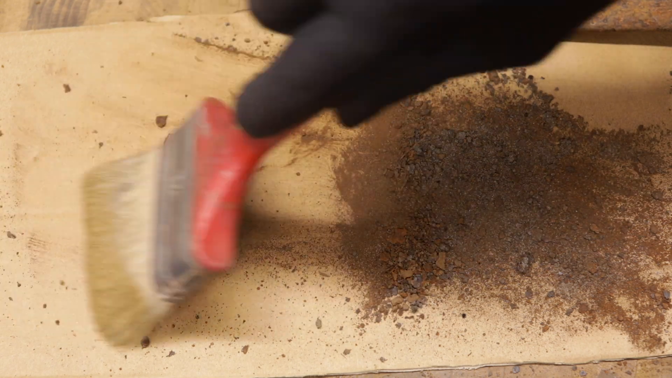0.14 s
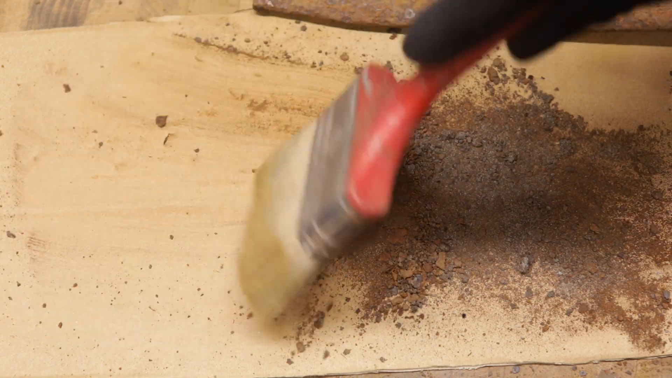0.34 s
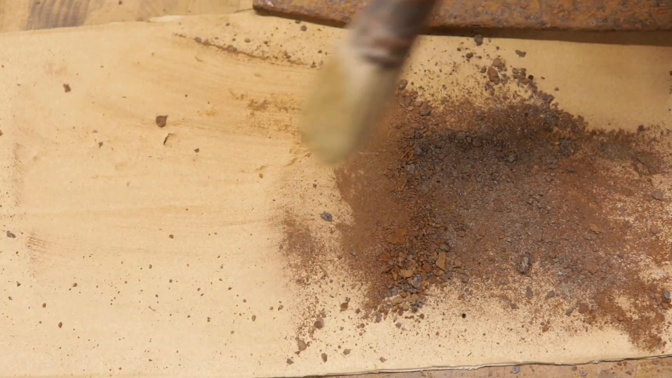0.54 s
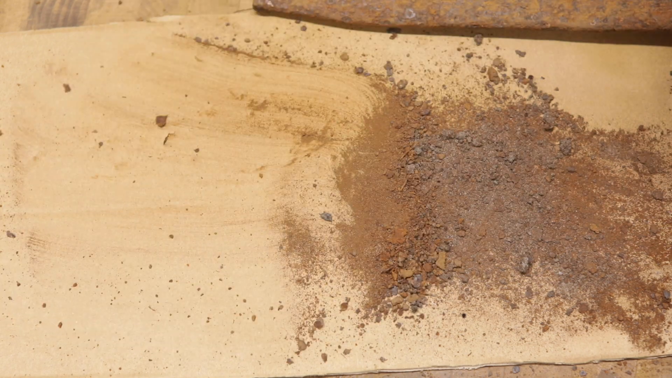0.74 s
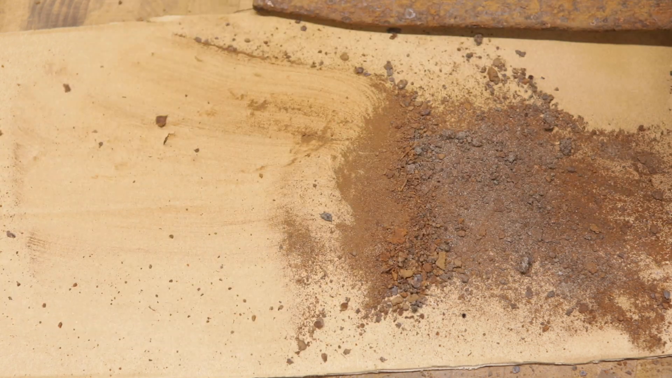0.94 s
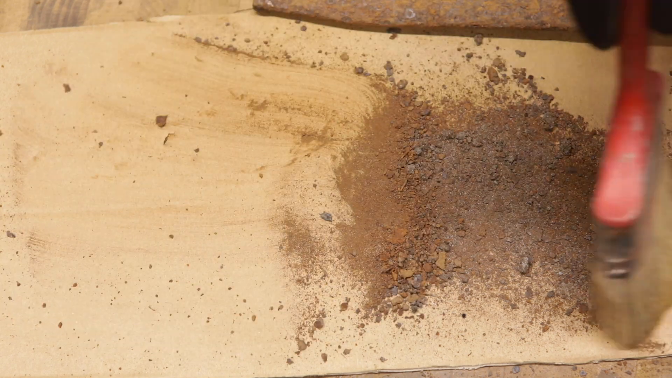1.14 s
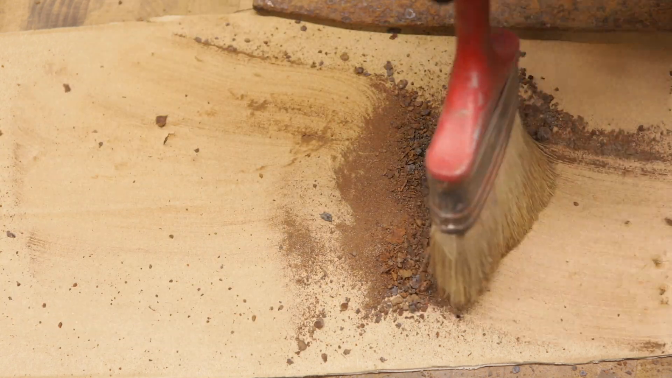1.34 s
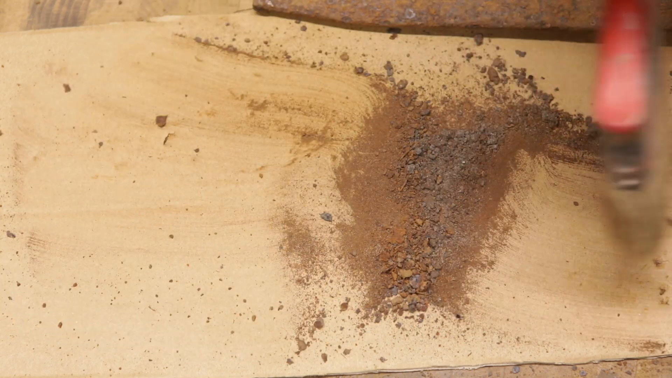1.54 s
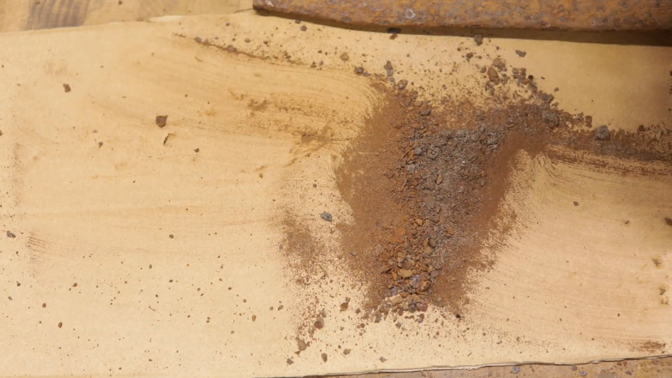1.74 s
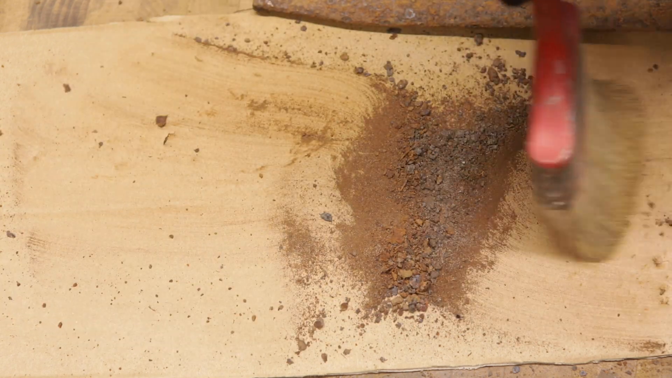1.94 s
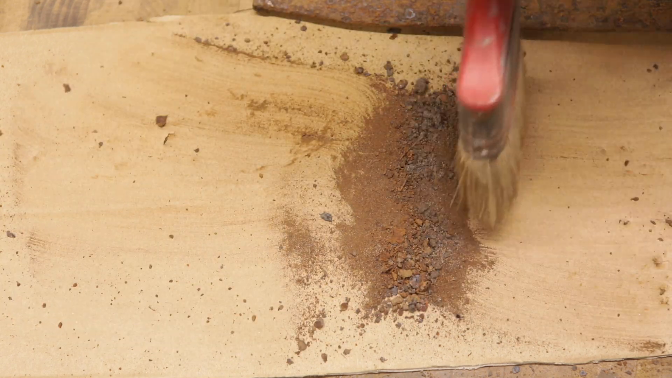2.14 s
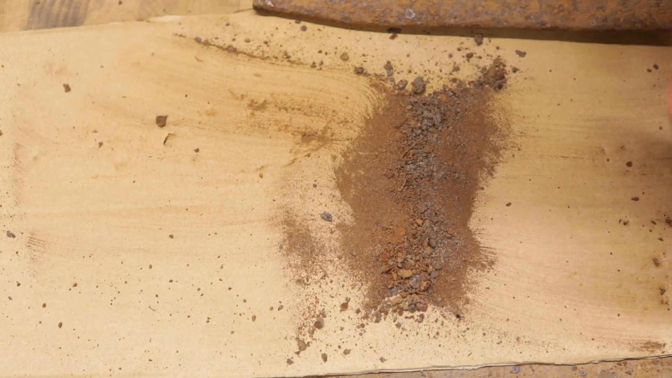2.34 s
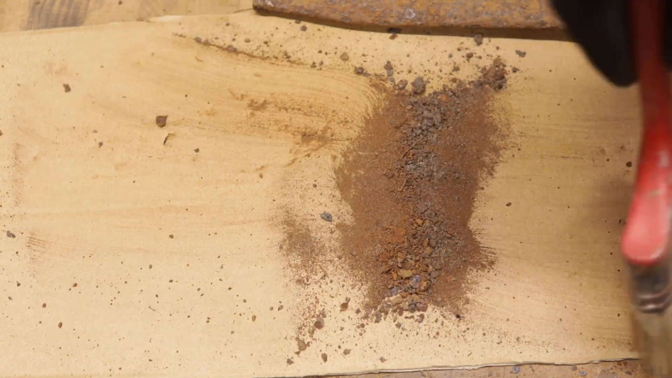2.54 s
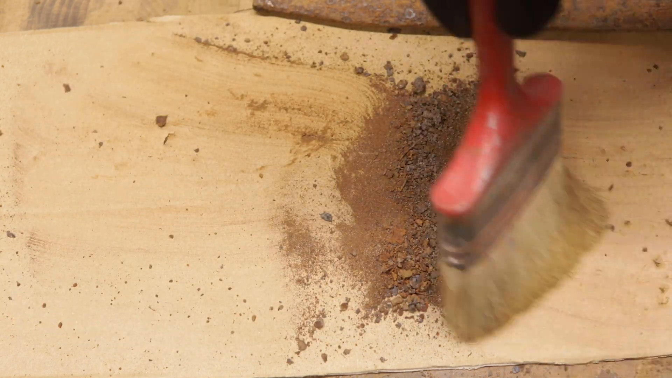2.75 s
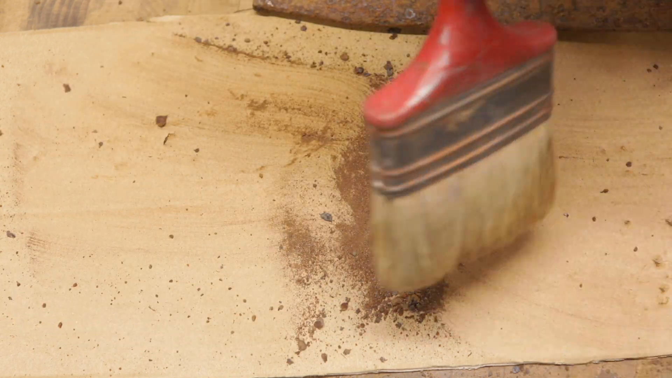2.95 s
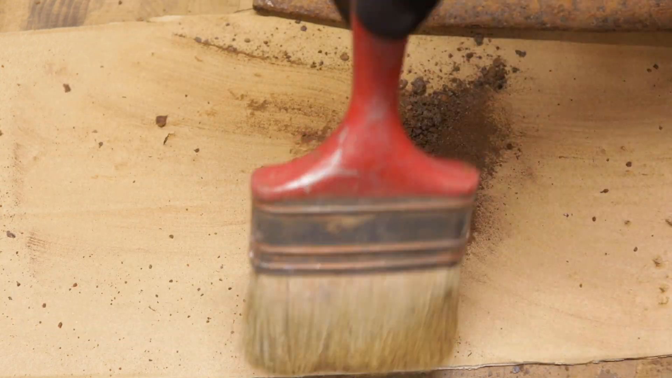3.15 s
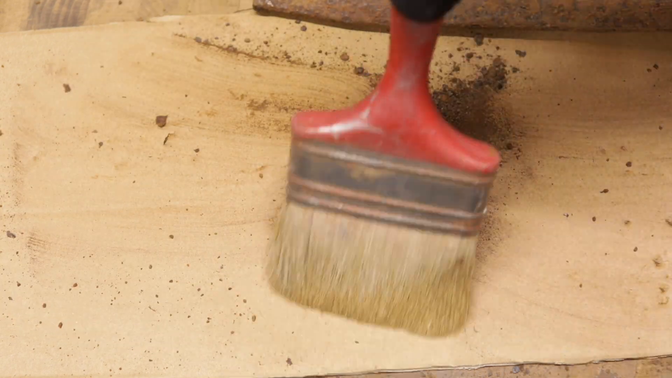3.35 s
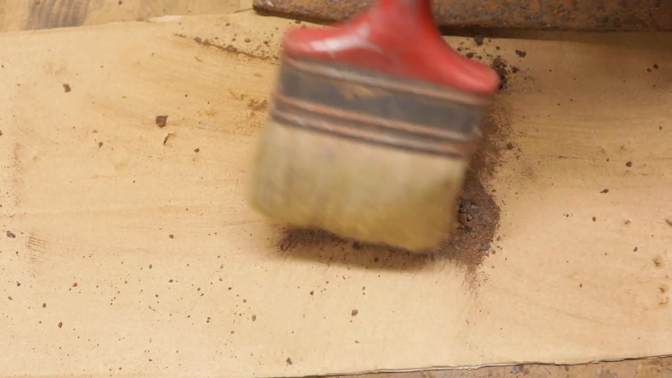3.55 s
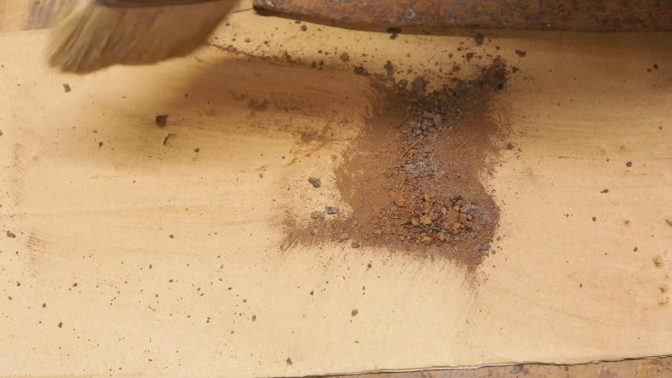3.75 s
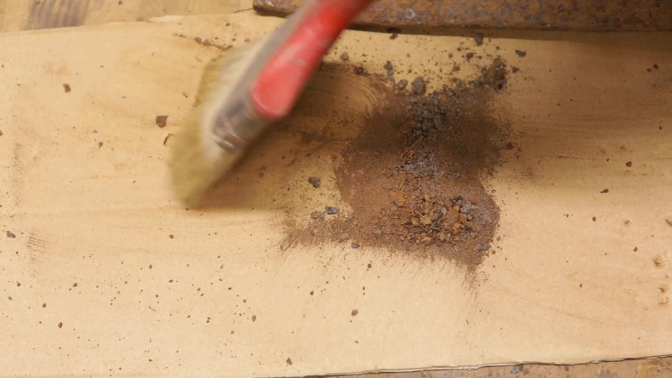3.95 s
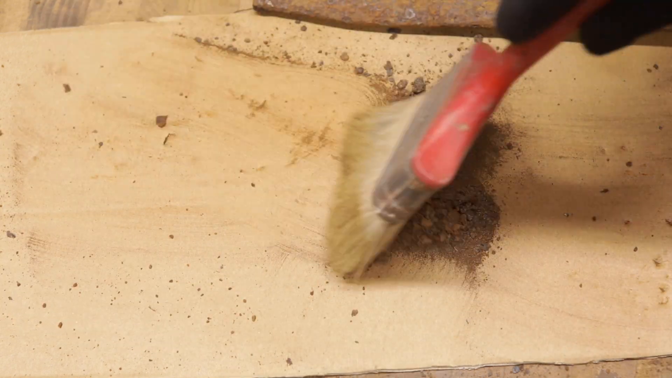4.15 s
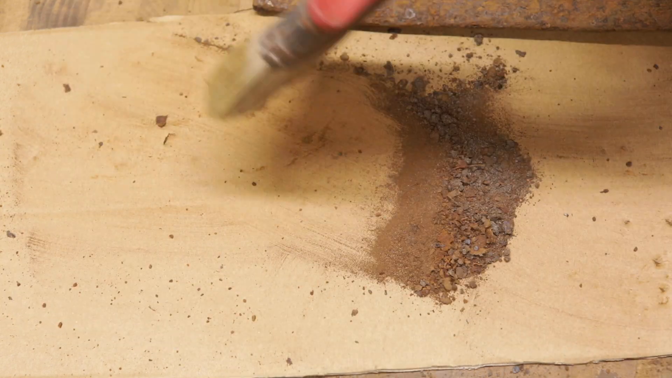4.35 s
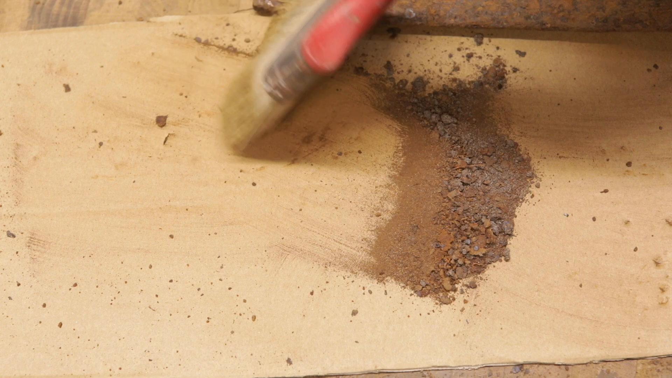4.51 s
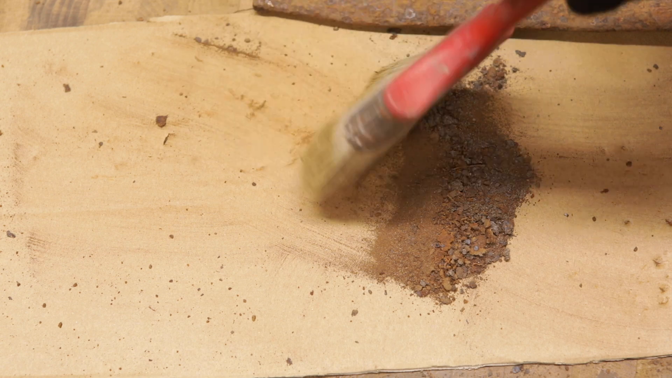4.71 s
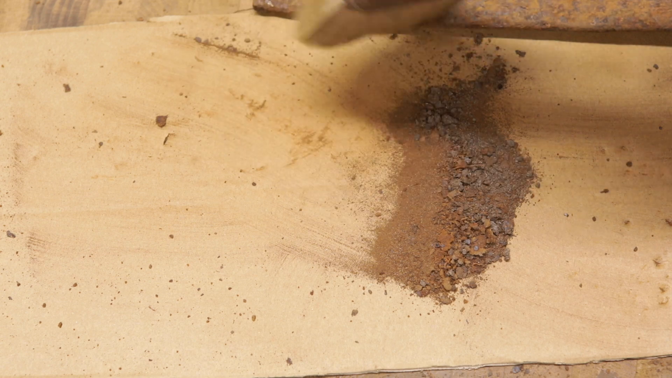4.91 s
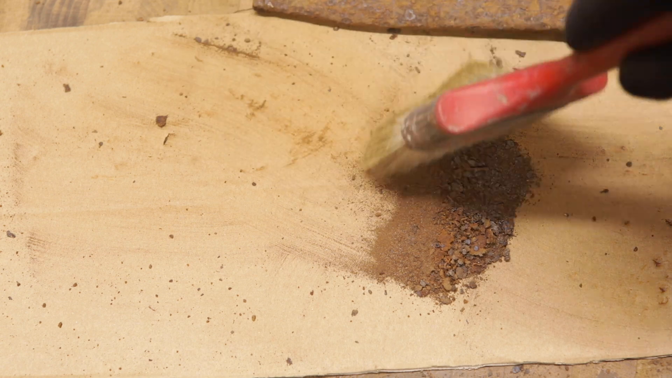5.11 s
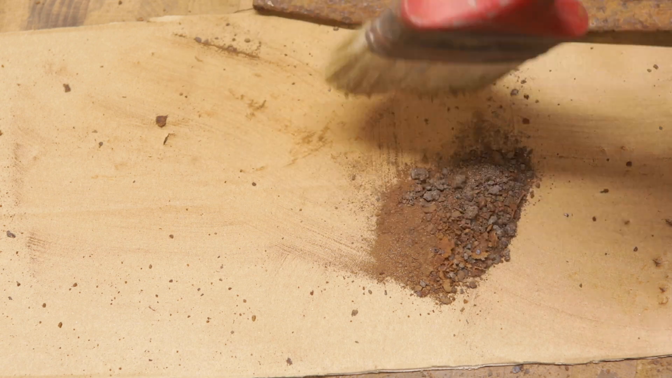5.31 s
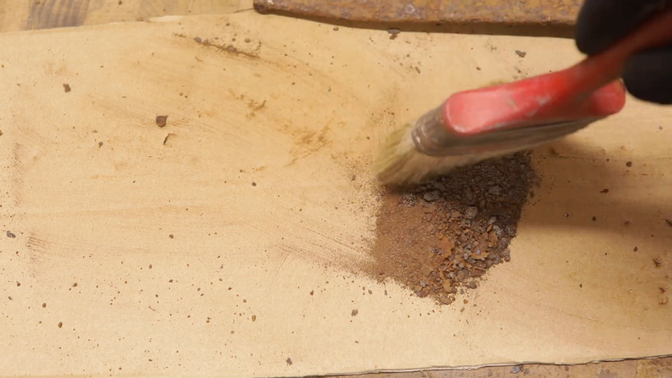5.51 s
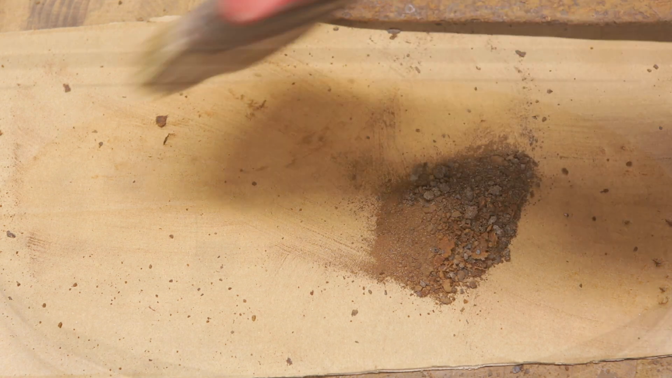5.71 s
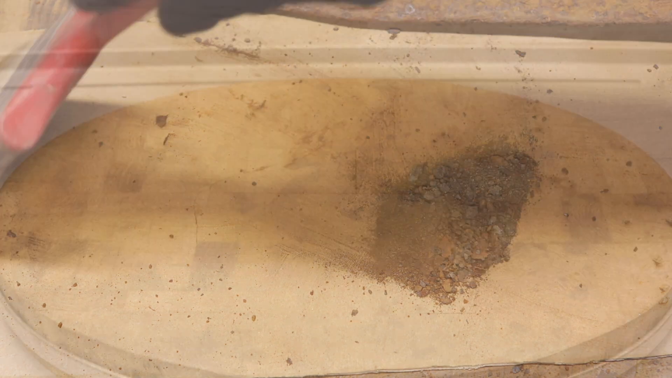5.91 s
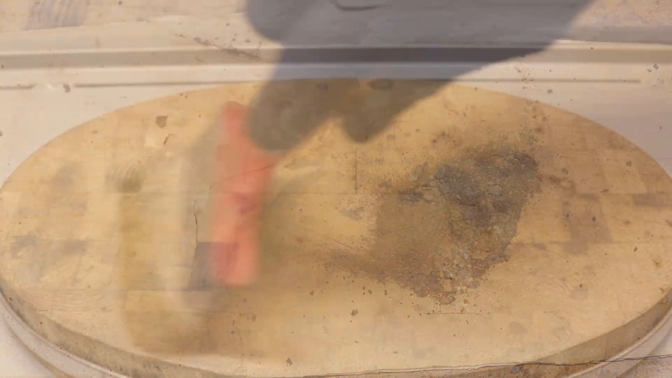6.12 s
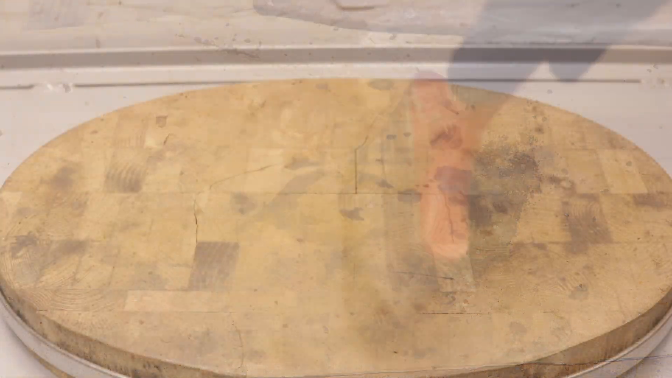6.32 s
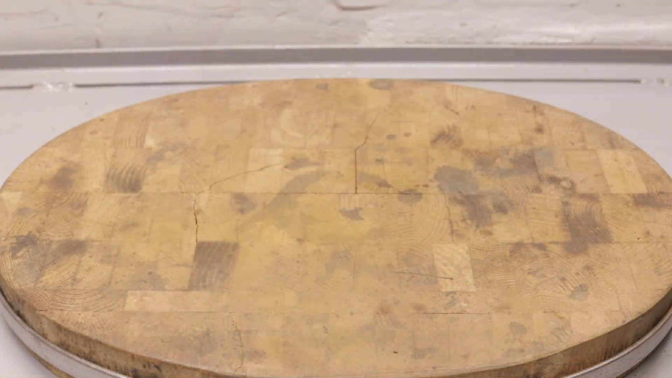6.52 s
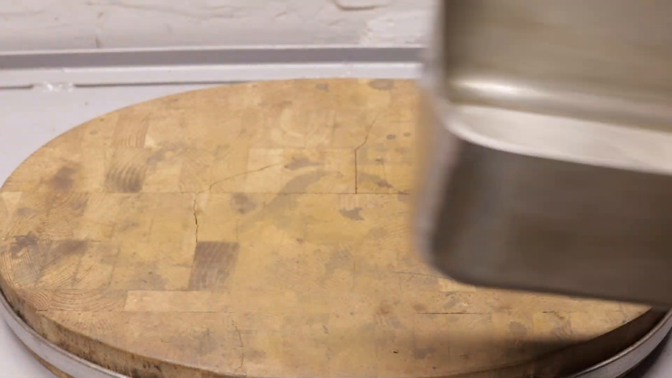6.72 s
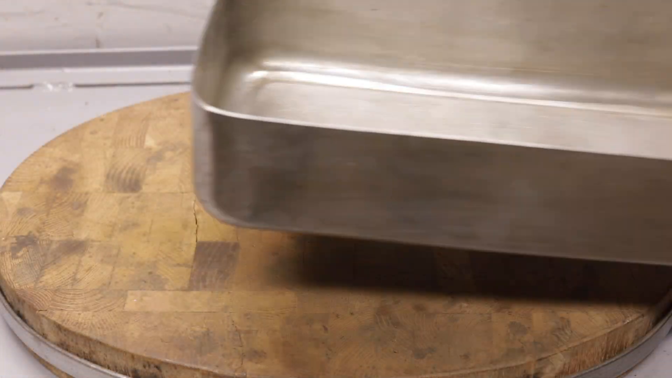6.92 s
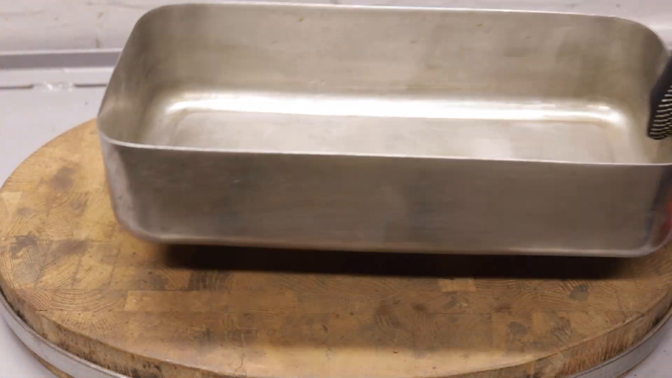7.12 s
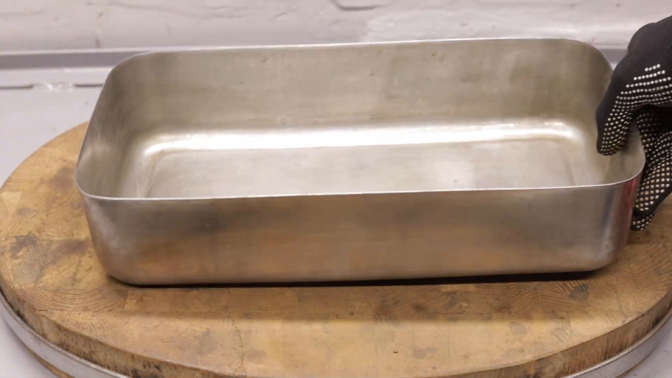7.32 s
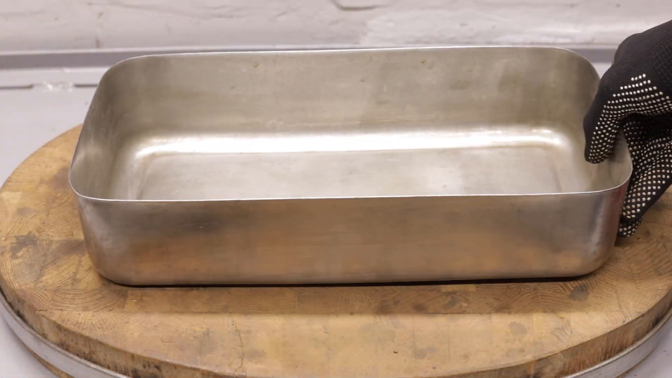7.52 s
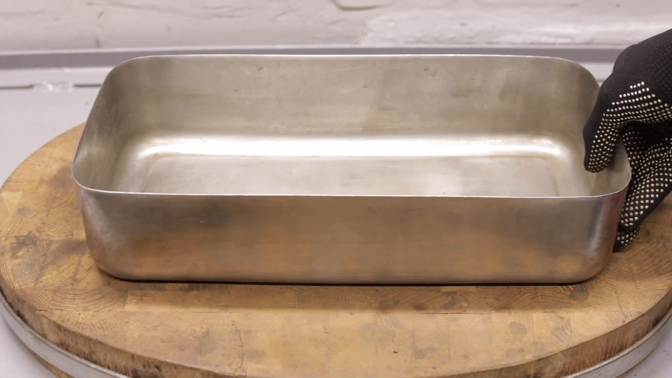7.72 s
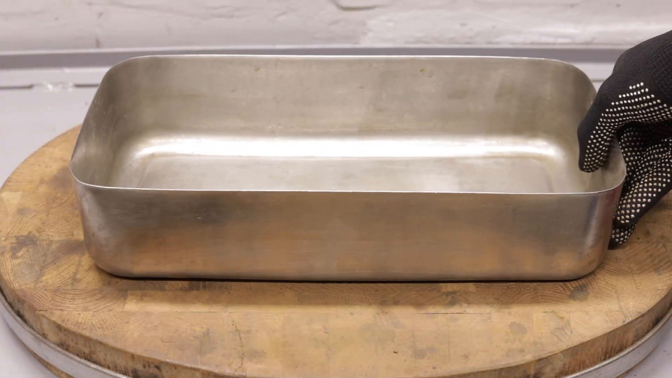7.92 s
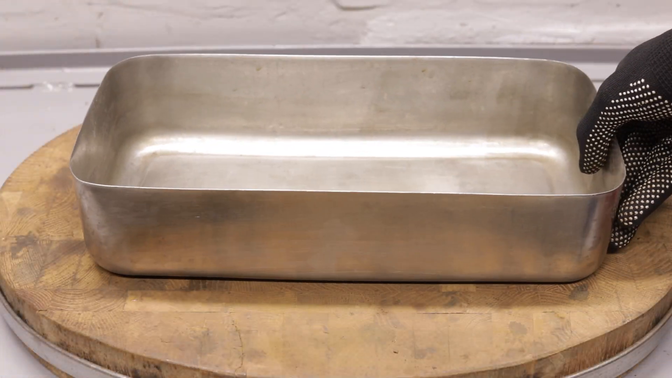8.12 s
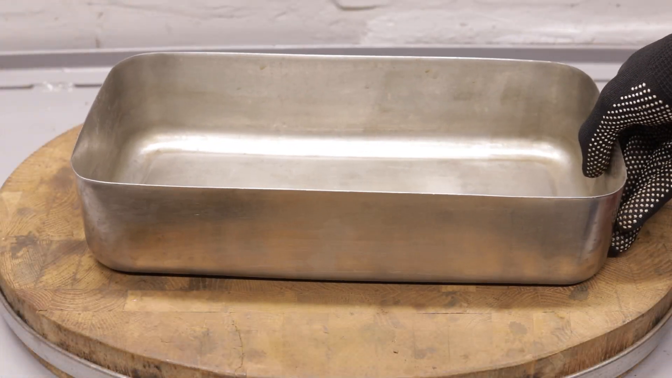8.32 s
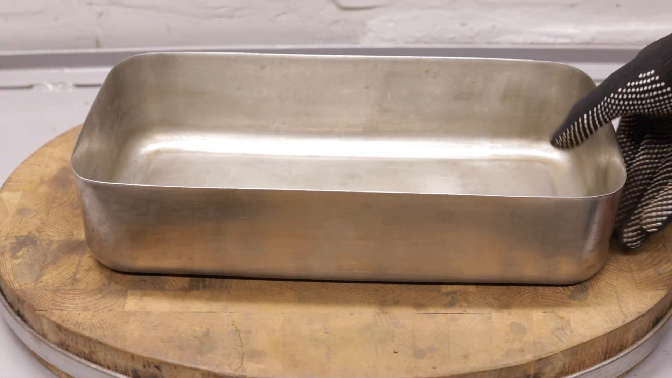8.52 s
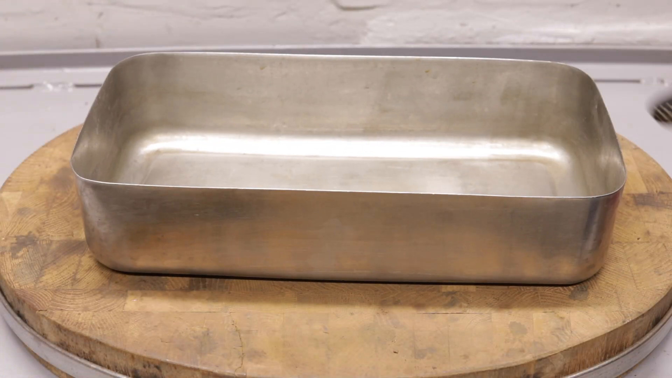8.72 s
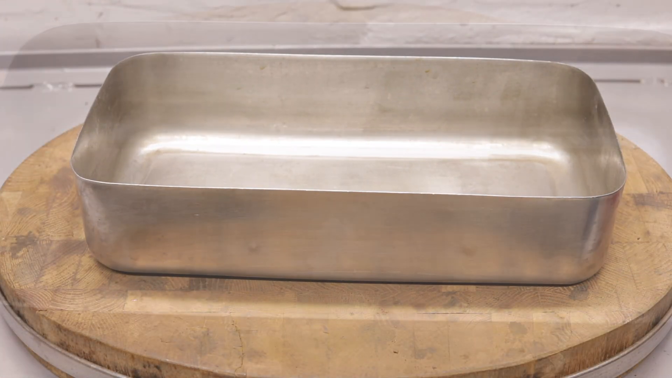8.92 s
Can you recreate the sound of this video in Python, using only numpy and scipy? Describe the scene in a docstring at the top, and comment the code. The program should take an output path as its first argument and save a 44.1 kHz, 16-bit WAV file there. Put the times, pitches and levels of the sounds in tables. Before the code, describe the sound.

Very close in a small, quiet workshop, a stiff brush sweeps rusty grit across cardboard in about ten short, uneven strokes, each a dry hissing rasp with sharp little flake ticks. The sweeping fades out, a near-silent gap follows, then a thin steel tray is set on a wooden board: one edge clanks, and the other drops with a duller ringing clunk. Faint low rumble lies underneath.

```python
"""Brushed rust, then a tray set down

A paintbrush sweeps rust dust and flakes across cardboard in short strokes, close up in a small workshop. Brush
and flakes are hails of tiny random ticks, shaped in level and coloured by bristles, paper and board. The scene
fades to a quieter corner, where a gloved hand sets a steel tray down on a wooden board, first on one edge, then
flat, and lets it go: dying sines and banded noise ring at each contact. Shaped noise makes the air and a low
rumble; a fuzzy sine makes a faint far moan."""
import sys
import numpy as np
from scipy import signal
from scipy.io import wavfile
from scipy.ndimage import uniform_filter1d

SR = 44100
rng = np.random.default_rng(int(sys.argv[2]) if len(sys.argv) > 2 else 0)


def write(x):
    x = np.atleast_2d(x).T
    wavfile.write(sys.argv[1], SR, np.round(np.clip(x, -1, 1) * 32767).astype(np.int16))

N = 395136  # samples in the scene

# Brush strokes: touch_down_s, rest_s, speed_up_s, sweep_s, hiss_landing_db, hiss_full_speed_db,
# hiss_lift_off_db, drop_after_lift_db, then over the hiss: dust_fizz_db, early_rasp_db, late_rasp_db,
# board_drumming_db; rasp_pitch_hz, landing_s, dust_settling_db_per_s, extra_thud_db (paper and board),
# mid_sweep_press_db
BRUSH_STROKES = [(0.056, 0.053, 0.039, 0.16, -39, -27.5, -26, 15.3, 0.85, -10.5, -5, -26.5, 3700, 0.0055, 79, 5, 2.5),
                 (0.738, 0.0039, 0.025, 0.046, -50, -49.5, -54, 11, 3, -7.5, -7, -17, 2660, 0.0074, 85, -3, 3.5),
                 (0.955, 0.11, .14, 0.095, -46, -26.5, -27.5, 12.7, 0.68, -3, -1, -24.5, 3250, .003, 73, -2.5, 2),
                 (1.732, 0.05, 0.032, 0.21, -37, -31.5, -26, 9.5, 0.5, -7.5, 0.5, -22.5, 3600, 0.0039, 102.5, 3, -2),
                 (2.518, 0.068, 0.045, 0.16, -38.5, -36, -30.5, 11.8, 0.19, -6, 3, -25.5, 3350, 0.011, 86.4, 4.5, 3),
                 (3.22, 0.047, 0.079, 0.11, -37.5, -28, -33, 9, 1.5, -7.5, -2, -28, 4100, .022, 86.4, -1, 2),
                 (3.9, 0.047, 0.038, 0.21, -47.5, -44, -37, 7.9, 2.5, -2.5, -3.5, -16, 3430, 0.021, 82, 11, 4),
                 (4.537, 0.025, 0.06, .13, -40.5, -32, -32.5, 15.7, 0.46, -6.5, -3.5, -19.5, 3640, 0.0072, 75, -1.5, 1.5),
                 (5.013, 0.047, 0.051, 0.093, -43.5, -36, -31, 10, 1.1, 1, -0.5, -12, 2900, .03, 80, -11, 2),
                 (5.436, 0.062, 0.048, 0.049, -44, -37.5, -41, 4.7, 1.9, -1.5, -4, -16, 3040, 0.033, 80, 7, 1),
                 (6.02, 0.0086, 0.07, 0.19, -38.5, -28, -26.5, 6, 2.4, -11.5, -14, -31.5, 4260, 0.0095, 79.8, 13, 2)]
# Colours of the brush, shape only. Columns: frequency_hz, level_db_per_hz
BRISTLE_HISS = [(2500, -36.5), (4000, -10), (5500, -5.5), (6800, 1), (7600, 0.5), (8600, -8.5),
                (10000, -28.5)]
DUST_FIZZ = [(7500, -33.5), (8700, -5), (10100, 2), (11900, -3.5), (15000, -17.5), (16000, -24.5)]
CARDBOARD_RASP = [(600, -30), (1100, -10), (1600, 0), (2100, 0.5), (2600, 2), (3400, 0), (4500, 1),
                  (6000, -26)]
BOARD_DRUMMING = [(250, -26.5), (500, 2), (800, 9.5), (1250, 11), (1800, -19.5)]
# Share of the swell and fall followed by hiss, fizz, rasp, drumming: share (0-1)
SWELL_SHARE = (1, 0.99, 0.95, 0.61)
# Landing bump of hiss, fizz, rasp, drumming, before each stroke's extra thud: bump_db
LANDING_BUMP_DB = (-2, -4.5, 6.5, 7)
# Flakes that snap or drop back on the cardboard: start_s, burst_level_db, low_part_over_it_db
FLAKE_DROPS = [(0.069, -30, -1), (0.1486, -29, -24), (0.1705, -16, -12), (0.2014, -16, -16),
               (0.484, -33.5, -4), (0.5025, -28, -16), (0.5467, -38, -19), (0.559, -35.5, -25),
               (0.5906, -34.5, -22), (1.012, -36.5, -15), (1.021, -28, -24), (1.5574, -43.5, 11),
               (1.628, -38, -1), (1.743, -26, -6.5), (1.856, -22, -19.5), (2.401, -38.5, -18),
               (2.451, -41, -21), (2.6081, -14.5, -9.5), (3.166, -46, -17), (3.243, -26, -13),
               (3.275, -24, -16), (3.615, -34, -1), (3.649, -36, -20), (3.834, -44, -22),
               (3.8844, -33, -19), (4.4676, -41.5, -18), (4.5055, -41, -16), (5.2547, -14.5, -36),
               (5.3558, -32.5, 3), (5.7554, -47, -38), (5.8177, -31, -5.5)]
# Colour of a ticking flake, shape only: frequency_hz, level_db_per_hz
FLAKE_SNAP = [(3500, -32.5), (6000, -4), (7500, -2.5), (10500, -2), (14000, -11.5), (16000, -9.5)]
# Clear modes of the steel tray: pitch_hz, tilted_on_edge_db, lying_flat_db, t60_s (at ring factor 1)
TRAY_MODES = [(125.8, -25, -29.5, 0.85), (173.5, -32, -16.5, 0.61), (249, -34, -8.5, 0.3),
              (309, 0.5, -23.5, 0.36), (409, -24, -8, 0.26), (530, -4, -10.5, 0.59), (557, -12.5, -8, 0.78),
              (718, -5, -22, 0.86), (754, 1, -3, 0.51), (830, -22, -0.5, 0.44), (900, -3, -10, 0.73),
              (980, -1.5, -18.5, 0.81), (1098, -22, -16, 0.58), (1279, 0.5, -10, 0.71),
              (1456, -8, -36, 0.74), (1500, -18.5, -38, 0.19), (1670, -11, -22.5, 0.25),
              (1975, -9, -36, 0.47), (2140, -24.5, -6, 0.65), (2280, -21, -13, 0.43),
              (2440, -9.5, -31.5, 0.67), (2603, -11.5, -13.5, 0.62), (2980, -15, -22, 0.62),
              (3490, -23, -41.5, 0.97), (3630, -26, -37, .5), (3850, -23, -44.5, .45),
              (3905, -23, -42, 0.62), (4220, -23, -28, 0.2), (4780, -26, -42.5, 0.62),
              (5222, -20.5, -45, 0.29), (6200, -24, -34, .45), (6600, -31, -36, 0.33),
              (7400, -32, -43, 0.85)]
# Tray contacts: start_s, ring_db, rise_s, hardness_db_per_octave, ring_factor (on t60), flatness (0-1),
# knock_db, knock_pitch_factor
TRAY_CONTACTS = [(7.3815, -22, 0.00062, 0, 0.67, 0.03, -7, 0.99),
                 (7.385, -21, 0.00094, 3.5, 0.072, 0.25, -14, 1.17),
                 (7.403, -38.5, .002, -6.5, 0.68, 0.3, -34, 0.92),
                 (7.456, -27, 0.0045, -1.5, 1, 0.01, -22, 2),
                 (7.681, -40, 0.00049, 4, 0.8, 0.54, -31.5, 0.75),
                 (7.797, -24, 0.0041, 2.5, 0.27, 1, -15, 0.94),
                 (7.8156, -22.5, 0.0014, -3, 0.79, 0.8, -20, 0.84),
                 (7.939, -55.5, 0.0014, 7.5, 0.3, 0.5, -40, 1.3), (8.182, -57, 0.00051, 6, 1, 1, -65, 1.2),
                 (8.229, -57, 0.0027, -7.5, 0.95, 0.96, -37, 0.62),
                 (8.283, -50, 0.0016, 6, 0.57, 0.96, -54, 0.65)]
# Colour of tray modes too crowded to tell apart, before ridges and hardness: frequency_hz, level_db_per_hz
CROWDED_MODES = [(60, -58), (120, -16.5), (300, -12.5), (800, -1.5), (1300, -5.5), (1800, -13),
                 (2500, -17.5), (3300, -27), (5600, -40), (7000, -33), (10000, -34), (15000, -46)]
# Decay of those crowded modes, before ridges and ring factor: frequency_hz, t60_s
CROWDED_T60 = [(300, 0.75), (1000, 0.63), (3000, 0.9), (7000, 0.47), (14000, 0.12)]
# Modes of the wooden board under the tray, at pitch factor 1: pitch_hz, level_db, t60_s
BOARD_KNOCK = [(776, -1, 0.096), (988, -4.5, 0.062), (2270, -4, 0.014)]
# A faint far moan: time_s, level_db, pitch_hz
FAR_MOAN = [(4.3, -72, 637), (4.6, -57, 665), (4.95, -58, 660), (5.199, -72, 638), (5.8, -69, 660)]
# Air of the workshop and of the quieter corner, shape only: frequency_hz, level_db_per_hz
WORKSHOP_AIR = [(59, -33.5), (100, -3), (255, -6.5), (492, -7.5), (676, -9), (1130, -13), (1250, -13),
                (4200, -25.5), (4870, -29.5), (11200, -25.5), (16000, -29.5)]
CORNER_AIR = [(53, -21), (90, -13), (103, -4), (249, -4), (323, -10), (419, -6.5), (568, -10.5),
              (690, -9.5), (737, -8.5), (1070, -11.5), (1160, -11.5), (5300, -29.5), (16000, -26.5)]
# Faint workshop hum: pitch_hz, level_db (rms, before the fade)
WORKSHOP_HUM = [(123.8, -72.5), (301.5, -73.5), (463.0, -72.5)]
# Far machinery or traffic, before the waver: time_s, level_db
RUMBLE_LEVEL = [(0.0, -62.5), (1.3, -65.5), (2.2, -68), (2.6, -64.5), (3.4, -60), (4.4, -59.5),
                (6.0, -69.5), (6.6, -61), (7.6, -65.5), (8.96, -68)]
# Colour of that rumble, shape only: frequency_hz, level_db_per_hz
RUMBLE_COLOUR = [(20, -17), (45, -6), (56, 3.5), (62, -6.5), (70, 9), (80, -14.5), (100, -13), (140, -40.5)]
# One place gives way to the other: from_s, to_s
PLACE_FADE = (5.91, 6.395)

THUD_S = 0.016  # decay constant of the landing bump
SETTLE_DB, DROP_S = -4, 0.09  # bristles settle after landing; time constant of the drop after lift-off
# Rasp pitch starts at LAND_HZ, moves to the stroke's pitch, sags by a factor, then glides to TAIL_HZ
LAND_HZ, SAG, TAIL_HZ, GLIDE_S = 2950, 0.85, 2400, 0.32
HASTE, LINGER = 1.22, 0.88  # settling-rate factors: fine dust is faster, rasp slower, drumming slower still
LAG_S = 0.016  # rasp and drumming keep shifting against the hiss this long after lift-off
SURGE_DB = 0.7  # uneven hand pressure
SMALL_T60_S, LONGER = 0.0048, 0.42  # decay of a -40.5 dB flake; dB of length per dB of level
CRUMBS_DB, CRUMBS_T60_S = -16, 0.05  # crumbs scatter after each flake
TRICKLE_DB = -72  # grains that keep falling between strokes
HAZE_DB, CRACK_DB = 17, -25  # gain of the crowded modes; gain of the contact tick at hardness 0
SHOP_DB, CORNER_DB, WAVER_DB = -58.5, -61, 2.5  # the two airs; rms waver of the rumble
ROOM_T60_S, ROOM_DB = 0.3, -10
EDGE_HZ = 15800  # cutoff of the final low-pass; almost nothing sounds above it


def gain_of(db):
    """Decibels to gain."""
    return 10 ** (np.asarray(db) / 20)


def evened(x):
    """Scales to rms 1."""
    return x / np.sqrt(np.mean(x ** 2) + 1e-20)


def drift(size):
    """Slow random wandering of rms 1: noise smoothed twice over size samples."""
    once = uniform_filter1d(rng.standard_normal(N), size=size)
    return evened(uniform_filter1d(once, size=size))


def read(points, hz):
    """Reads a spectrum on a log-frequency axis."""
    f, value = np.transpose(points)
    return np.interp(np.log(hz + 1), np.log(f + 1), value)


def add(mix, s, sound):
    """Mixes a sound in at time s."""
    part = mix[round(s * SR):][:len(sound)]
    part += sound[:len(part)]


def response(points, size=2048):
    """Causal, minimum-phase impulse response of energy 1 with the given spectrum."""
    hz = abs(np.fft.fftfreq(2 * size, 1 / SR))
    log_gain = np.log(gain_of(read(points, hz)))
    spectrum = np.exp(log_gain - 1j * signal.hilbert(log_gain).imag)
    taps = np.fft.ifft(spectrum).real[:size]
    return taps / np.linalg.norm(taps)


def grit(per_s, spread_db):
    """Random tiny impacts of either sign, most small, a few large, scaled to rms 1."""
    size_db = spread_db * np.minimum(rng.exponential(1, N), 4.2)
    size = gain_of(size_db) * rng.choice([-1., 1.], N)
    return evened(size * (rng.random(N) < per_s / SR))


def resonate(x, hz, width):
    """A moving resonance: shifts the curve hz down to zero, smooths, and shifts back at gain 1."""
    turn = np.exp(2j * np.pi * np.cumsum(hz) / SR)
    r = np.exp(-np.pi * width / SR)
    return 2 * (turn * signal.lfilter([1 - r], [1, -r], x / turn)).real


def brush():
    """Bristles drag over grit: a dense hail of ticks that sounds in the bristles, the paper and the board."""
    levels = np.zeros((4, N))
    rasp_hz = np.full(N, float(TAIL_HZ))
    for s, *row in BRUSH_STROKES:
        swell, hz = stroke(*row)
        for level, part in zip(levels, swell):
            add(level, s, part)
        rasp_hz[round(s * SR):][:len(hz)] = hz
    levels *= np.interp(np.arange(N) / SR, PLACE_FADE, (1, 0))
    levels *= gain_of(SURGE_DB * drift(700))
    coarse = grit(per_s=400.0, spread_db=4.0)  # large flakes tick in every part at once
    parts = []
    for level, colour in zip(levels, (BRISTLE_HISS, DUST_FIZZ, CARDBOARD_RASP, BOARD_DRUMMING)):
        # grit comes in clumps
        clumps = gain_of(1.27 * evened(uniform_filter1d(rng.standard_normal(N), 600)))
        ticks = evened(clumps * grit(per_s=12000., spread_db=2.5) + 0.33 * coarse)
        parts.append(signal.oaconvolve(ticks * level, response(colour))[:N])
    hiss, fizz, rasp, drum = parts
    return hiss + fizz + 0.72 * rasp + 0.55 * resonate(rasp, rasp_hz, 980.0) + drum


def stroke(rest, rise, sweep, land_db, full_db, lift_db, drop_db, fizz_db, early_db, late_db, drum_db,
           top_hz, land, tail_db, knock_db, arch_db):
    """Levels of the four parts and rasp pitch through landing, rest, speed-up, sweep and lift-off."""
    marks = np.cumsum([0, rest, rise, sweep])
    t = np.arange(0, marks[-1] + .6, 1 / SR)
    along = np.clip((t - marks[2]) / sweep, 0, 1)
    after = np.maximum(t - marks[3], 0)  # seconds since lift-off

    hiss_db = np.interp(t, marks, (land_db, land_db + SETTLE_DB, full_db, lift_db))
    hiss_db += arch_db * np.sin(np.pi * along)
    hiss_db -= drop_db * (1 - np.exp(-after / DROP_S))  # the brush lifts quickly, then the dust settles

    late = (late_db - early_db) * np.clip((t - marks[2]) / (sweep + LAG_S), 0, 1) ** 0.98
    over_hiss = (0, fizz_db, early_db + late, drum_db + late / 2)
    bumps = np.add(LANDING_BUMP_DB, (0, 0, knock_db, knock_db))
    settling = (1, HASTE, LINGER, LINGER ** 2)
    levels = []
    for share, over_db, bump_db, rate in zip(SWELL_SHARE, over_hiss, bumps, settling):
        swell_db = full_db + share * (hiss_db - full_db) + over_db
        thud_db = bump_db * np.exp(-t / THUD_S)
        levels.append(gain_of(swell_db + thud_db - rate * tail_db * after))

    hz_marks = [0, marks[2], marks[3], marks[3] + GLIDE_S]
    hz = np.interp(t, hz_marks, (LAND_HZ, top_hz, SAG * top_hz, TAIL_HZ))
    return np.minimum(t / land, 1) * np.array(levels), hz


def flakes():
    """Each flake is a noise burst with a fast decay and a fainter crumb tail; small grains trickle at random."""
    out, t = np.zeros(N), np.arange(1500) / SR
    high, low = response(FLAKE_SNAP), response(CARDBOARD_RASP)
    noises = rng.standard_normal((len(FLAKE_DROPS), len(t)))
    for (s, db, low_db), noise in zip(FLAKE_DROPS, noises):
        t60 = SMALL_T60_S * gain_of(LONGER * (db + 40.5))  # larger flakes crumble longer
        crumbs = gain_of(CRUMBS_DB - 60 * t / CRUMBS_T60_S)
        fall = gain_of(-60 * t / t60) + crumbs
        burst = gain_of(db) * fall * np.minimum(t / 0.0011, 1) * noise
        add(out, s, np.convolve(burst, high + gain_of(low_db) * low))
    present = np.interp(np.arange(N) / SR, PLACE_FADE, (1, 0))
    trickle = gain_of(TRICKLE_DB) * present * grit(per_s=25.0, spread_db=3.5)
    return out + signal.oaconvolve(trickle, high)[:N]


def tray():
    """Each contact rings clear modes, a haze of faint ones and the board; flatness sets which modes speak."""
    hz, edge_db, flat_db, t60 = np.tile(np.transpose(TRAY_MODES), 2)
    # each mode gets a fainter random close neighbour, so the ringing flutters like a tray rattling on the board
    neighbour = np.arange(len(hz)) >= len(TRAY_MODES)
    side = rng.choice([-1, 1], len(hz))
    hz = hz + neighbour * side * rng.uniform(7.0, 16., len(hz)) * np.sqrt(hz / 1000)
    lumps_db = 7. * (rng.exponential(1, 513) - 1).clip(-1, 2)  # ridges of the haze, shared by all contacts
    wood_hz, wood_db, wood_t60 = np.transpose(BOARD_KNOCK)
    out, t = np.zeros(N), np.arange(round(.9 * SR)) / SR
    for s, db, rise, tilt_db, ring, flat, knock_db, pitch in TRAY_CONTACTS:
        mode_db = edge_db + flat * (flat_db - edge_db) + tilt_db * np.log2(hz / 1000) - 4.6 * neighbour
        clear = modes(hz, mode_db, ring * t60, rng.uniform(0, 2 * np.pi, len(hz)))
        wash = haze(tilt_db, ring, lumps_db)[:len(t)]
        # dry tick of contact
        tick = uniform_filter1d(np.diff(rng.standard_normal(len(t) + 1)), size=2)
        crack = gain_of(CRACK_DB + 4.8 * tilt_db - 60 * t / 0.043) * tick
        add(out, s, gain_of(db) * (clear + wash + crack) * (1 - np.exp(-t / rise)))
        knock = modes(pitch * wood_hz, wood_db, wood_t60, 0 * wood_hz, length=.1)
        knock_rise = 1 - np.exp(-t[:SR // 10] / (rise / 2))
        add(out, s, gain_of(knock_db) * knock * knock_rise)
    return signal.sosfilt(signal.butter(4, 90, "high", fs=SR, output="sos"), out)


def modes(hz, db, t60, phase, length=.9):
    """Sum of sines that die exponentially, as struck solid bodies do."""
    t = np.arange(round(length * SR), dtype=np.float32)[:, None] / np.float32(SR)
    rate, turn, phase = (np.float32(v) for v in (np.log(1000) / t60, 2 * np.pi * hz, phase))
    return (np.exp(-rate * t) * np.sin(turn * t + phase)) @ np.float32(gain_of(db))


def haze(tilt_db, ring, lumps_db):
    """Noise that dies band by band, bunched in narrow ridges: the sum of countless close modes."""
    hz, t, z = signal.stft(rng.standard_normal(SR), SR, nperseg=1024, noverlap=896)
    ridges_db = lumps_db * np.clip(hz / 4000, .45, 1)
    colour_db = read(CROWDED_MODES, hz) + ridges_db + tilt_db * np.log2(hz / 1000 + .05)
    t60 = ring * read(CROWDED_T60, hz) * gain_of(0.16 * lumps_db)  # strong ridges ring longer
    dying = z * gain_of(colour_db[:, None] - 60 * t / t60[:, None])
    return gain_of(HAZE_DB) * signal.istft(dying, SR, nperseg=1024, noverlap=896)[1]


def room(x):
    """Sparse reflections of random sign that die away."""
    taps = np.zeros(SR // 2)
    at = np.arange(200, SR // 2 - 20, 20)
    taps[at + rng.integers(0, 20, len(at))] = rng.choice([-1., 1.], len(at))
    taps = taps * gain_of(-60 * np.arange(SR // 2) / SR / ROOM_T60_S)
    return signal.oaconvolve(x, taps / np.linalg.norm(taps))[:N]


def whine():
    """A far moan: a gliding sine made narrow and fuzzy by slow noise, swelling and fading."""
    s, db, hz = np.transpose(FAR_MOAN)
    t = np.arange(N) / SR
    fuzz = drift(900)
    level = gain_of(np.interp(t, s, db, -200, -200))
    return level * fuzz * np.sin(2 * np.pi * np.cumsum(np.interp(t, s, hz)) / SR)


def air(points, size=2048):
    """Steady noise with a given spectrum."""
    return signal.oaconvolve(rng.standard_normal(N + size), response(points, size=size), "valid")[:N]


def background():
    """Workshop air and hum cross-fade to the corner's air, over a wavering low rumble."""
    t = np.arange(N) / SR
    corner_share = np.interp(t, PLACE_FADE, (0, 1))
    rumble_db = np.interp(t, *np.transpose(RUMBLE_LEVEL)) + WAVER_DB * drift(5000)
    rumble = gain_of(rumble_db) * air(RUMBLE_COLOUR, size=16384)
    noise = rng.standard_normal(N)
    hum = sum(gain_of(db) * evened(resonate(noise, np.full(N, float(hz)), 2.1)) for hz, db in WORKSHOP_HUM)
    shop = gain_of(SHOP_DB) * air(WORKSHOP_AIR) + hum
    corner = gain_of(CORNER_DB) * air(CORNER_AIR)
    return (1 - corner_share) * shop + corner_share * corner + rumble


def scene():
    """Brush, flakes and tray in the room, over the background and the far moan."""
    near = brush() + flakes() + tray()
    return (near + gain_of(ROOM_DB) * room(near) + background() + whine())[None]


def record(dry):
    """Limits the band with a steep low-pass at EDGE_HZ."""
    low_pass = signal.firwin(511, EDGE_HZ, window=("kaiser", 9), fs=SR)
    return signal.oaconvolve(dry, low_pass[None], "same")


dry = scene()
out = record(dry)
write(out)
```